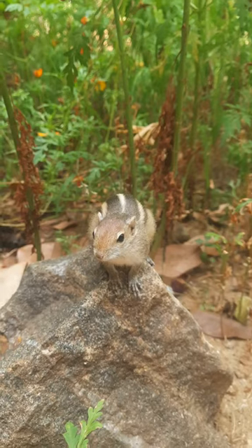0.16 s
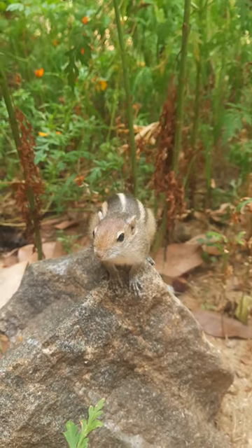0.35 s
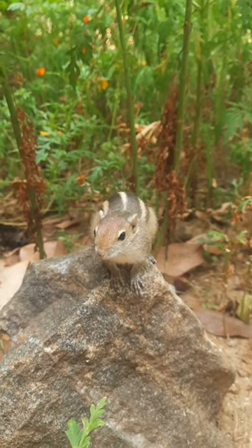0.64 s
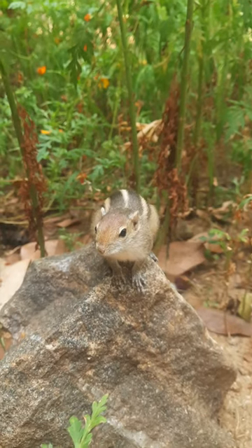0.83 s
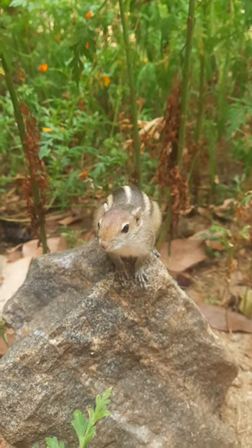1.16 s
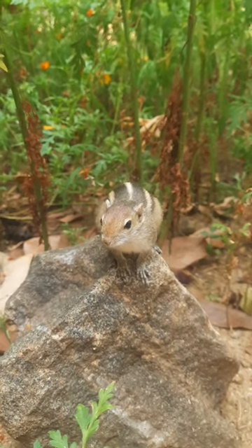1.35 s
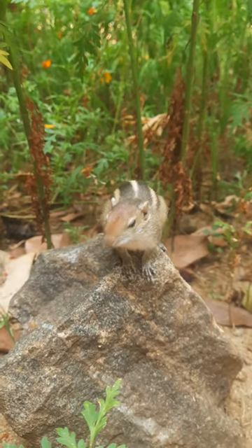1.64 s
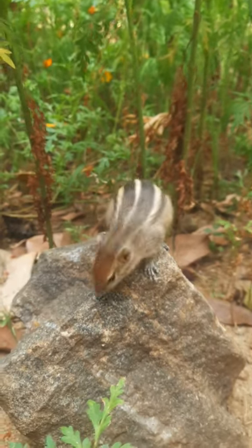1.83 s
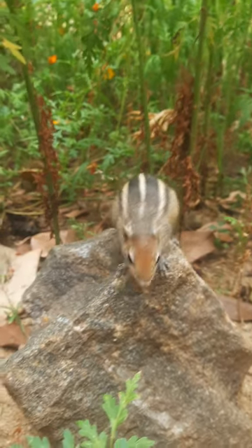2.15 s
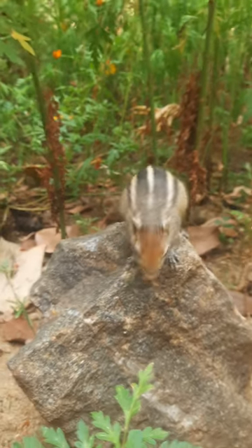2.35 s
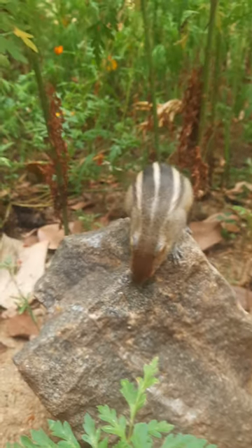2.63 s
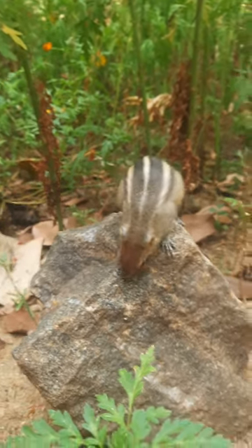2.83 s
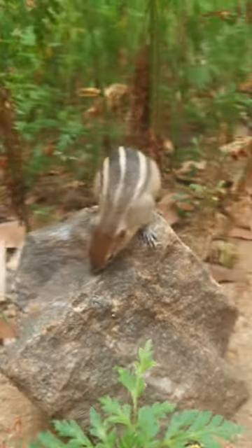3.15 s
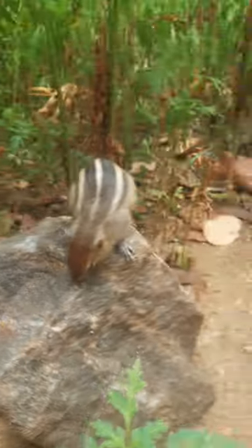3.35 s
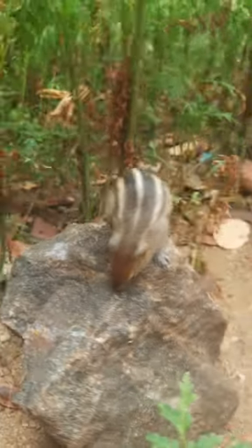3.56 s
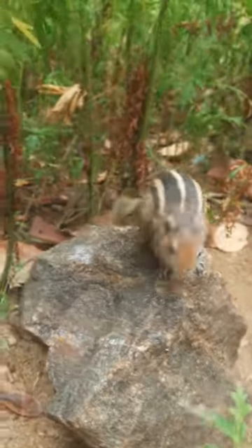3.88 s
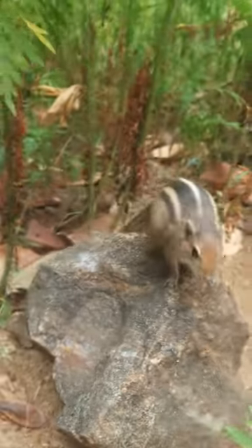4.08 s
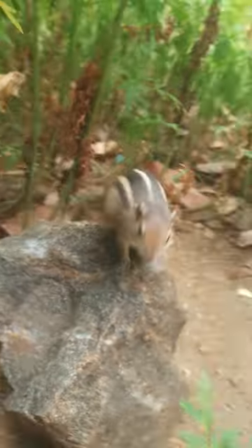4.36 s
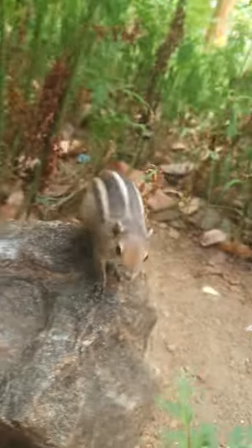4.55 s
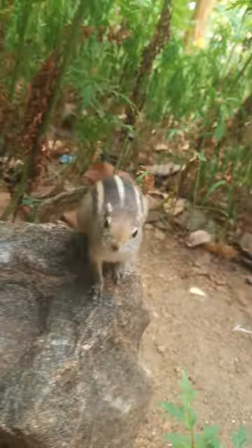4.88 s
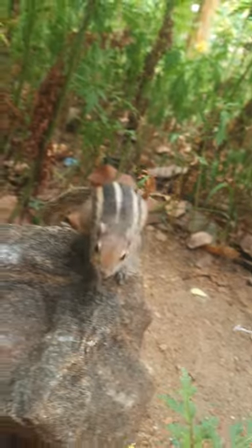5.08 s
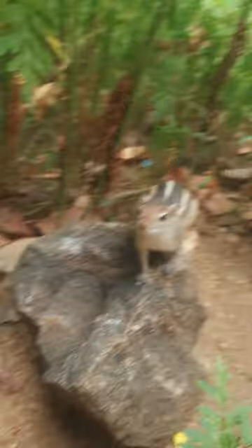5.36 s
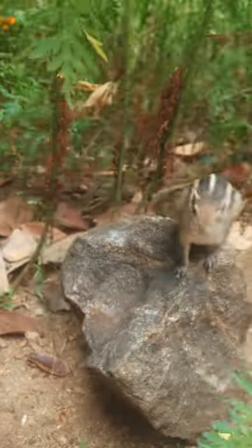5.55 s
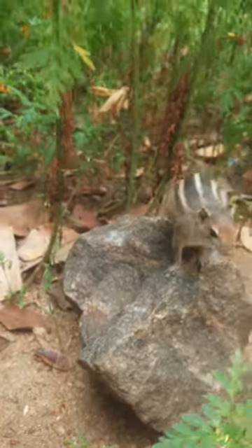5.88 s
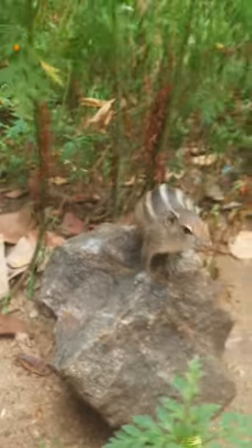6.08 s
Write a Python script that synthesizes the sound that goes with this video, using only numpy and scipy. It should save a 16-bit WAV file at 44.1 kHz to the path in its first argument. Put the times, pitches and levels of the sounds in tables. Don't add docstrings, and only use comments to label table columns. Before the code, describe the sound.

In a roadside garden, a squirrel gives six bright double-squeak chirps between birds' whistles, while traffic rumbles low and a vehicle passes.

```python
import sys
import numpy as np
from scipy import signal
from scipy.io import wavfile
from scipy.ndimage import map_coordinates

SR = 44100
rng = np.random.default_rng(int(sys.argv[2]) if len(sys.argv) > 2 else 0)


def bounce(signal):
    frames = np.transpose(np.atleast_2d(signal))
    limited = np.clip(frames, -1, 1)
    pcm = np.round(limited * 32767).astype(np.int16)
    wavfile.write(sys.argv[1], SR, pcm)


def makeup_ratio(level_db):
    decades = np.asarray(level_db, float) / 20
    return 10 ** decades


N = 273861

# f/Hz, left-right correlation/1
PORT_LIKENESS = [(60, 0.98), (150, 0.95), (380, 0.92), (950, 0.44), (2380, -0.02), (5980, -0.11),
                 (15000, 0.95)]


def rms_one(x):
    return x / np.sqrt(np.mean(x ** 2) + 1e-20)


def at_hz(points, hz):
    f, value = np.transpose(points)
    return np.interp(np.log(hz), np.log(f), value)


def drift(rate_hz, size):
    points = rng.standard_normal(int(size / SR * 400) + 4)[::max(int(400 / rate_hz), 1)]
    return map_coordinates(points, [np.linspace(0, len(points) - 1, size)], order=1)


def nearer(start_db, db_per_s):
    return start_db + db_per_s * np.arange(N) / SR


def band_pass(x, low_hz, high_hz):
    return signal.sosfilt(signal.butter(2, [low_hz, high_hz], "band", fs=SR, output="sos"), x)


def banded(spectrum, patchy_db):
    out = 0
    edges = 20 * 2 ** np.arange(0, 10, 1 / 3)
    white = rng.standard_normal((2, 2, N))
    for k, (low, high) in enumerate(zip(edges, edges[1:])):
        hz = np.sqrt(low * high)
        if spectrum[0][0] < hz < spectrum[-1][0]:
            mid, side = band_pass(white[k % 2], low, high)
            alike = np.clip(at_hz(PORT_LIKENESS, hz), -1, 1)
            gain = makeup_ratio(at_hz(spectrum, hz) + patchy_db * drift(8, N))
            out = out + gain * (np.sqrt(1 + alike) * mid + np.sqrt(1 - alike) * side * [[1], [-1]])
    return rms_one(out)


def airy(resonances):
    out = 0
    white = rng.standard_normal((len(resonances), N))
    for noise, (hz, width_hz, db) in zip(white, resonances):
        out = out + makeup_ratio(db) * rms_one(band_pass(noise, hz - width_hz / 2, hz + width_hz / 2))
    return rms_one(out)


def tone(hz, db, overtones, wobble):
    phase = 2 * np.pi * np.cumsum(hz * (1 + wobble * drift(200, len(hz)))) / SR
    effort = makeup_ratio(0.7 * (db - db.max()))
    wave = 0
    for k, level_db in overtones:
        strength = makeup_ratio(level_db) * (effort if k > 1 else 1)
        wave = wave + strength * np.sin(k * phase) * (k * hz < 16000)
    sample = np.arange(len(hz))
    edge_s = np.minimum(sample, sample[::-1]) / SR
    return np.sqrt(2) * makeup_ratio(db) * wave * np.minimum(edge_s / 0.0013, 1)


def add(out, s, sound):
    start = round(s * SR)
    out[start:start + len(sound)] += sound[:N - start]


def birds(calls, overtones, wobble, gain_db):
    out = np.zeros(N)
    for call in calls:
        s, hz, db = np.transpose(call)
        t = np.arange(round(s[0] * SR), round(s[-1] * SR)) / SR
        add(out, s[0], tone(np.interp(t, s, hz), np.interp(t, s, db) + gain_db, overtones, wobble))
    return out


def glides(calls, attack, release, start_db, end_db):
    u = np.linspace(0, 1, num=21)
    shape_db = np.interp(u, [0, attack, max(1 - release, attack), 1], [start_db, 0, 0, end_db])
    return [np.transpose([s + u * length, from_hz * (to_hz / from_hz) ** u, db + shape_db])
            for s, length, from_hz, to_hz, db in calls]


def garden(x, scatter_db, echo_db, late_db=-12):
    # delay/s, level/dB
    bounces = [(.0118, -5), (.0235, -17), (.040, -20)]
    wall_band = [2500, 3600]
    quick_t60_s, slow_t60_s, slow_cut_hz = 0.22, 0.83, 2120
    t = np.arange(round(1.2 * SR)) / SR
    direct = np.zeros(len(t))
    for delay, db in bounces:
        direct[round(delay * SR)] = makeup_ratio(db + echo_db)
    direct = signal.sosfilt(signal.butter(1, wall_band, "band", fs=SR, output="sos"), direct)
    direct[0] = 1
    shared = rng.standard_normal((2, 1, len(t)))
    own = rng.standard_normal((2, 2, len(t)))
    own = signal.lfilter([1, -0.75], [1], own)
    quick, slow = shared + 1.64 * own
    slow = signal.sosfilt(signal.butter(1, slow_cut_hz, fs=SR, output="sos"), slow)
    tail = makeup_ratio(-60 * t / quick_t60_s) * quick + makeup_ratio(late_db - 60 * t / slow_t60_s) * slow
    paths = direct + makeup_ratio(scatter_db) * np.clip(t / 0.0036, 0, 1) * tail
    return signal.fftconvolve(x[None], paths, axes=1)[:, :N]


def hiss():
    # f/Hz, level/dB per Hz
    rustle = [(2000, 7), (3000, -0.5), (4500, 0), (5800, -2.5), (8300, -2), (12000, -15.5)]
    leaves = banded(rustle, patchy_db=0.3)
    leaves = signal.sosfilt(signal.butter(12, 8460, fs=SR, output="sos"), leaves)
    white = rng.standard_normal((2, N))
    capsule = signal.sosfilt(signal.butter(2, 5000, "high", fs=SR, output="sos"), white)
    return makeup_ratio(nearer(-69, db_per_s=2.1)) * (leaves + makeup_ratio(-5.0) * capsule)


def road():
    # f/Hz, level/dB per Hz
    deep = [(13, -45), (22, -22.5), (48, -7), (80, 1.5), (143, -4), (264, -7), (325, -17.5), (380, -25.5),
            (433, -25), (500, -28), (650, -60.5), (1100, -120)]
    # f/Hz, level/dB per Hz
    tyres = [(210, -34.5), (350, 0.5), (434, -2.5), (480, -10), (537, -2.5), (583, -6.5), (632, -1),
             (679, -10), (729, -7), (1230, -8), (1580, -11), (4000, -25), (5200, -45.5), (8800, -120)]
    pass_s, pass_width_s, pass_db = 5.21, 0.45, 5
    passing_db = pass_db * np.exp(-((np.arange(N) / SR - pass_s) / pass_width_s) ** 2)
    rumble = makeup_ratio(nearer(-51, db_per_s=1.56)) * banded(deep, patchy_db=0.9)
    roar = makeup_ratio(nearer(-64.5, db_per_s=2.5) + passing_db) * banded(tyres, patchy_db=1.5)
    return rumble + roar


def engine():
    # t/s, firing level/dB, second order level/dB
    swells = [(0, -67, -44), (.67, -47.5, -48.5), (1.05, -45.5, -57.5), (1.5, -46.5, -42.5),
              (1.92, -49, -53), (2.52, -55.5, -47), (2.8, -51.5, -40), (3.3, -40, -40), (3.6, -45.5, -45),
              (3.91, -38, -41.5), (4.5, -39.5, -47), (4.79, -37.5, -43), (5.59, -40.5, -41.5),
              (5.7, -59, -53), (5.83, -44, -49), (5.92, -57.5, -51), (6.12, -40, -47), (6.21, -50, -42)]
    # multiple/1, level/dB against the second
    upper_orders = [(3, -11), (4, -15.5)]
    firing_hz, speed_up_hz_per_s, hum_hz = 62.0, 1.8, 121.6
    t = np.arange(N) / SR
    s, firing_points, second_points = np.transpose(swells)
    firing_db, second_db = np.interp(t, s, firing_points), np.interp(t, s, second_points)
    hz = firing_hz + speed_up_hz_per_s * t
    phase = 2 * np.pi * np.cumsum(hz * (1 + 0.00407 * drift(5, N))) / SR
    out = makeup_ratio(firing_db + 2 + 0.9 * drift(8.1, N)) * np.sin(phase)
    for k, order_db in [(2, 0.0017)] + upper_orders:
        level = makeup_ratio(second_db + order_db + 0.5 + 1.8 * drift(15, N))
        out += level * np.sin(k * phase + 0.6 * drift(9, N))
    return out + tone(np.full(N, hum_hz), nearer(-62.5, db_per_s=3.0), [(0.99, 0.013)], wobble=0.011)


def far_birds():
    # t/s, length/s, peak level/dB
    falling = [(.74, 0.15, -74.5), (0.882, 0.12, -60), (1.166, 0.15, -63.5), (1.898, .18, -74),
               (4.544, .15, -63.5), (4.834, 0.13, -62)]
    # t/s, length/s, from f/Hz, to f/Hz, peak level/dB
    faint = [(1.1, 0.074, 4080, 3530, -65.5), (2.14, 0.028, 4300, 4000, -73.5),
             (2.265, 0.081, 3960, 3590, -70)]
    from_hz, to_hz = 5040, 4600
    notes_far = [(s, length, from_hz, to_hz, db) for s, length, db in falling] + faint
    calls = glides(notes_far, attack=0.2, release=0.3, start_db=-13, end_db=-12)
    return birds(calls, [(1, 0)], wobble=0.014, gain_db=-8)


def thin_glides():
    # t/s, length/s, from f/Hz, to f/Hz, peak level/dB
    thin = [(1.742, .062, 7430, 6330, -38.5), (1.8, 0.154, 6347, 6260, -41.5),
            (1.938, 0.044, 6265, 6490, -27.5), (1.985, 0.038, 6500, 6620, -28),
            (5.58, 0.036, 7660, 7530, -43.5), (5.628, .026, 7490, 7440, -44.5),
            (5.652, 0.03, 7430, 7400, -42.5), (5.684, 0.045, 7350, 7230, -47),
            (5.716, .026, 7250, 7130, -46), (5.736, 0.016, 7210, 7210, -42)]
    # multiple/1, level/dB
    thin_overtones = [(2, -23.5)]
    calls = glides(thin, attack=0.56, release=0.44, start_db=-18, end_db=-14.5)
    return birds(calls, [(1, 0.0043)] + thin_overtones, wobble=0.004, gain_db=2.0)


def breath():
    # f/Hz, width/Hz, level/dB
    resonances = [(3807, 4500, -9.5), (6300, 2570, 1), (8830, 1300, -3), (10450, 1500, 1),
                  (13000, 1200, -10)]
    # t/s, length/s, peak level/dB
    gasps = [
        (4.205, 0.061, -26),
        (4.483, 0.017, -35),
    ]
    t = np.arange(N) / SR
    gain = np.zeros(N)
    for s, length, db in gasps:
        points_s = s + length * np.array([0, 0.15, 0.42, 0.75, 1])
        points_db = db + np.array([-18, -6.5, -2, -1, -19])
        gain += makeup_ratio(np.interp(t, points_s, points_db)) * (t > s) * (t < s + length)
    return airy(resonances) * gain


def rasp_and_tick():
    # t/s, length/s, from f/Hz, to f/Hz, peak level/dB
    rasp = [(4.212, 0.047, 2800, 6900, -32.5), (4.25, 0.0217, 6000, 7500, -30.5),
            (4.222, .046, 2600, 5800, -33), (4.203, .034, 3200, 9900, -43)]
    # t/s, length/s, from f/Hz, to f/Hz, peak level/dB
    tick = [
        (4.485, .006, 8870, 4600, -33),
        (4.4875, 0.0053, 5630, 2950, -35.5),
    ]
    # multiple/1, level/dB
    partials = [(1, -2), (2, -23)]
    rasps = glides(rasp, attack=0.32, release=0.074, start_db=-8, end_db=3)
    ticks = glides(tick, attack=0.37, release=0.21, start_db=-21, end_db=-8)
    out = birds(rasps, partials, wobble=0.018, gain_db=4.5)
    return out + birds(ticks, partials, wobble=0.012, gain_db=5.0)


def rising_whistles():
    # t/s, time until the sweep/s, held f/Hz, level/dB
    whistles = [
        (.63, .172, 2511, -30.5),
        (1.232, .214, 2424, -29.5),
        (6.088, .19, 2498, -32),
    ]
    settle_s, settle_sharp, settle_db = 0.066, 1.085, -26.5
    sweep_s, top_hz, sweep_db = 0.081, 4195, -3.5
    stop_s, stop_db, break_db = 0.011, -19, -9
    calls = []
    for s, hold, hz, db in whistles:
        turn_s, swept_db = s + hold, db + sweep_db
        calls.append([
            (s, hz * settle_sharp, db + settle_db),
            (s + settle_s / 3, hz * (1 + settle_sharp) / 2, db + settle_db * 0.46),
            (s + settle_s, hz, db),
            (turn_s - 0.015, hz, db),
            (turn_s, hz * 1.03, db + break_db),
            (turn_s + 0.011, hz * 1.08, swept_db),
            (turn_s + sweep_s * 0.45, hz * 1.28, swept_db),
            (turn_s + sweep_s, top_hz, swept_db - 3.0),
            (turn_s + sweep_s + stop_s, top_hz, swept_db + stop_db)])
    return birds(calls, [(1, 1), (3, -47.5)], wobble=0.0016, gain_db=-0.56)


def hoot():
    # t/s, f/Hz, level/dB
    course = [(2.221, 1770, -69.5), (2.229, 1940, -38), (2.241, 2035, -23), (2.256, 2064, -17),
              (2.268, 2088, -15), (2.285, 2067, -16), (2.293, 2050, -29)]
    # multiple/1, level/dB
    hoot_overtones = [(2, -38.5), (3, -52), (4, -55.5), (5, -27.5), (6, -33), (7, -48)]
    return birds([course], [(0.99, 0.025)] + hoot_overtones, wobble=0.002, gain_db=-1.0)


def squirrel():
    # t/s, peak level/dB, pitch factor/1, time to the second squeak/s
    chirps = [(2.5225, -15.5, 1.011, 0.046), (2.8567, -15, 0.98, 0.048), (3.1646, -14.5, 0.98, 0.047),
              (3.471, -14, 0.99, 0.048), (3.7325, -14, 1.01, 0.0475), (3.9823, -13.5, 1.004, 0.048)]
    dip_hz = [3500, 2883, 2123, 1750, 1651, 1758, 1946, 2256, 2390]
    fall_hz = [3750, 3336, 2945, 2531, 2170, 1605, 1325]
    soft_hz = [866, 1108, 1166, 1218, 1170, 1060]
    dip_db = [-3, 0.9, -3, -8.5, -10, -8.3, -5.5, -3.5, -12]
    fall_db = [-13, -0.5, 2.5, -1.5, -3, -11.5, -23]
    soft_db = [-35, -24.5, -20, -24, -21.5, -33]
    # multiple/1, level/dB
    squeak_overtones = [(2, -42), (3, -50)]
    # f/Hz, width/Hz, level/dB
    wheeze = [(5900, 6400, -10.5), (10150, 1350, -2), (11950, 1600, -14)]
    break_s, fall_s, soft_after_s, soft_s = 0.0037, 0.0258, 0.111, 0.031
    out, air = np.zeros(N), airy(wheeze)
    for s, db, pitch, gap in chirps:
        parts = [(0, gap - break_s, dip_hz, dip_db, -28.5),
                 (gap, fall_s, fall_hz, fall_db, -28.5),
                 (soft_after_s, soft_s, soft_hz, soft_db, -51.5)]
        for wait, length, hz, level_db, air_db in parts:
            where = [np.linspace(0, len(hz) - 1, round(length * SR))]
            glide = map_coordinates(np.array(hz, float), where, order=2, mode="nearest")
            shape_db = map_coordinates(np.array(level_db, float), where, order=2, mode="nearest")
            start = s - 0.0015 + wait
            voice = tone(pitch * glide, db + shape_db + 0.1, [(0.99, 0.00071)] + squeak_overtones, wobble=0.0052)
            add(out, start, voice)
            puff = air[round(start * SR):][:len(shape_db)]
            add(out, start, makeup_ratio(db + 0.78 * shape_db + air_db) * puff)
    return out


def scene():
    left_db, left_lead_s = 1.5, 0.000037
    calls = garden(far_birds(), scatter_db=-19, echo_db=-3, late_db=-3)
    calls = calls + garden(thin_glides() + breath() + rasp_and_tick(), scatter_db=-35, echo_db=-9)
    calls = calls + garden(rising_whistles() + hoot(), scatter_db=-39.0, echo_db=-6.0)
    left, right = calls + garden(squirrel(), scatter_db=-38.5, echo_db=-4.0)
    right = map_coordinates(right, [np.arange(N) - left_lead_s * SR], order=3)
    mix = np.array([left, right]) + engine() + road() + hiss()
    return mix * makeup_ratio([[left_db / 2], [-left_db / 2]])


def top_cut(x):
    return signal.sosfilt(signal.butter(12, 16470, fs=SR, output="sos"), x)


def record(dry):
    fade_start, fade_in_s, top_hz = 0.089, 1.1, 15850
    faded = dry * np.clip(fade_start + np.arange(N) / SR / fade_in_s, 0, 1)
    finished = signal.sosfilt(signal.ellip(10, 0.3, 60, top_hz, fs=SR, output="sos"), faded)
    return top_cut(finished)


dry = scene()
out = record(dry)
bounce(out)
```